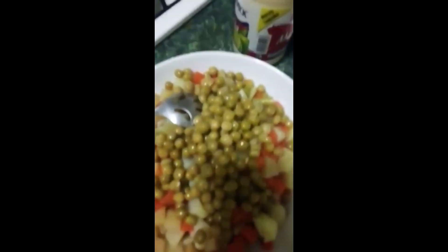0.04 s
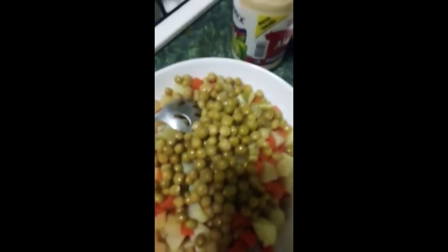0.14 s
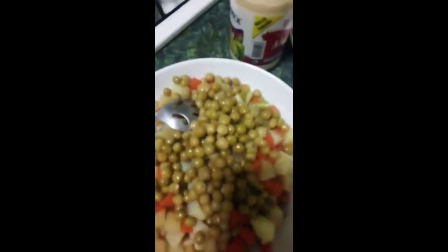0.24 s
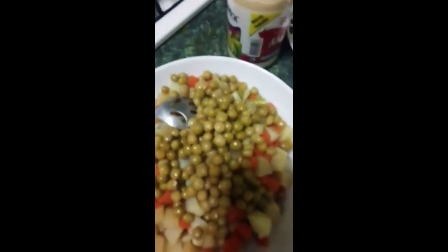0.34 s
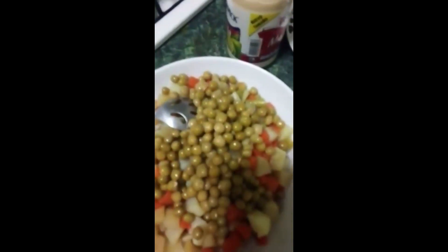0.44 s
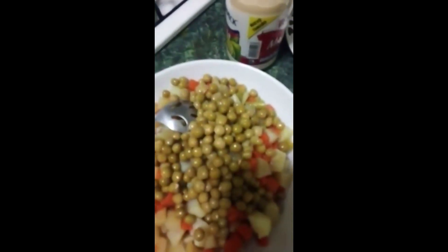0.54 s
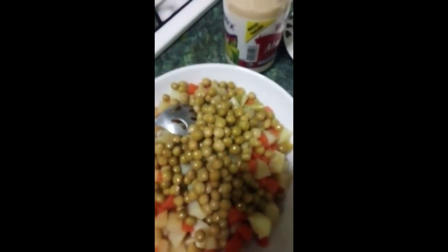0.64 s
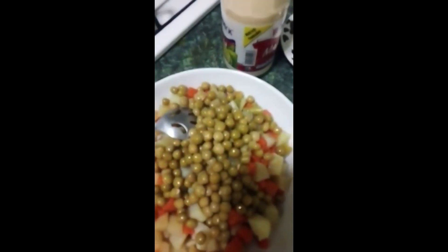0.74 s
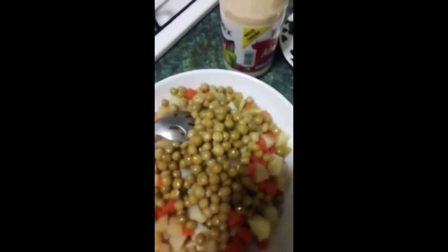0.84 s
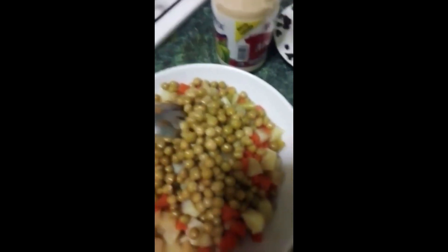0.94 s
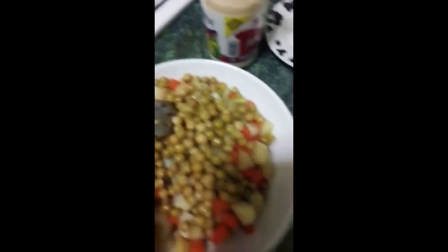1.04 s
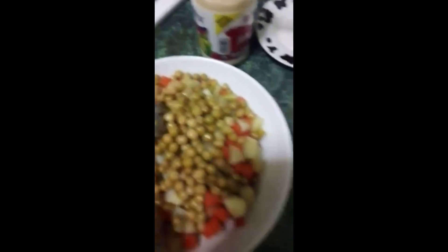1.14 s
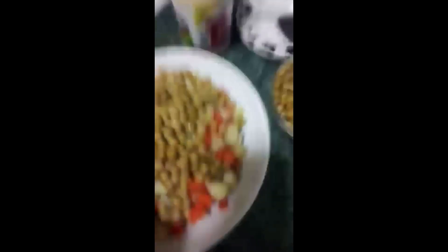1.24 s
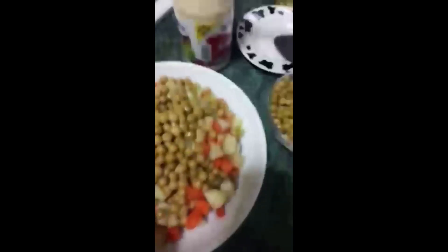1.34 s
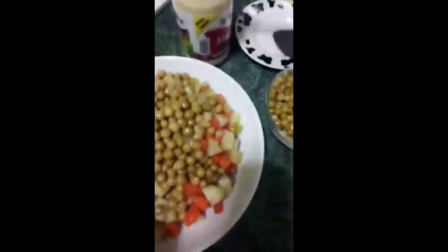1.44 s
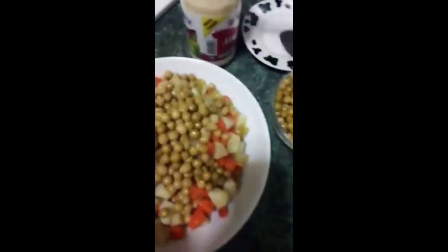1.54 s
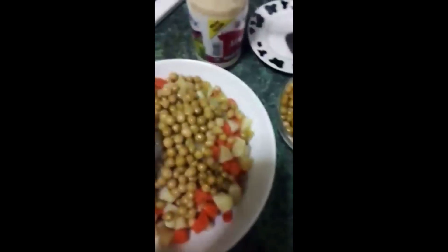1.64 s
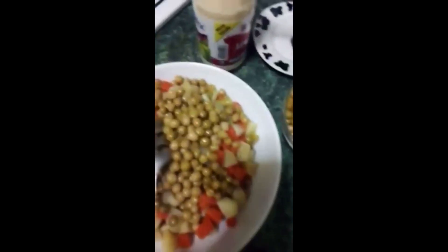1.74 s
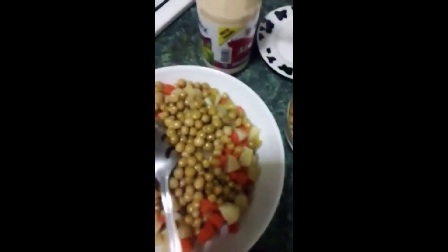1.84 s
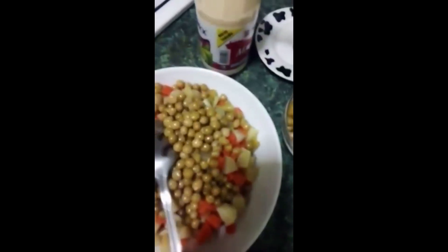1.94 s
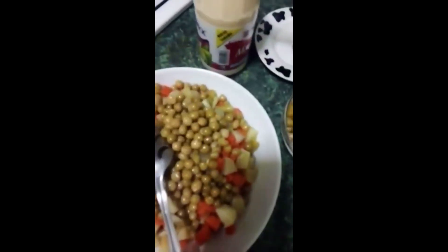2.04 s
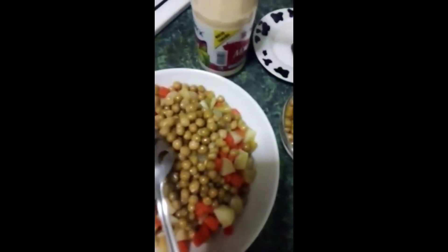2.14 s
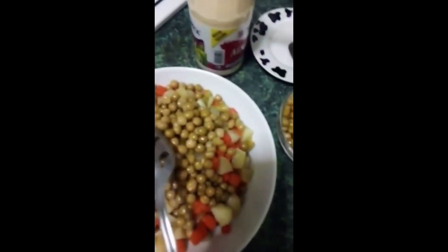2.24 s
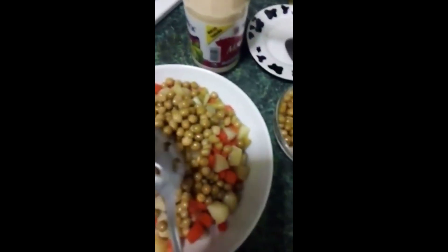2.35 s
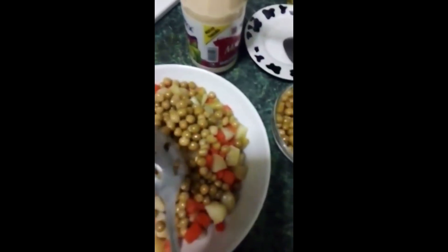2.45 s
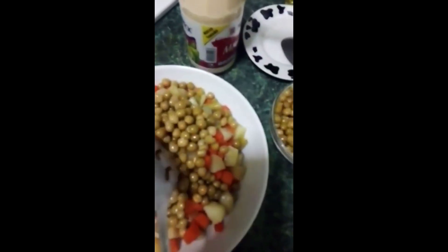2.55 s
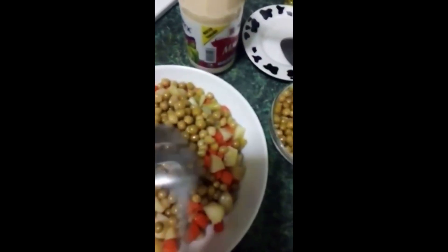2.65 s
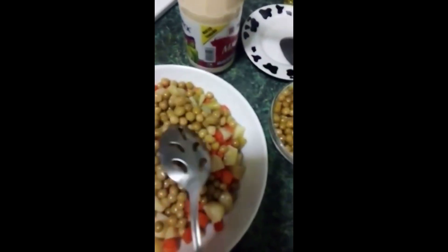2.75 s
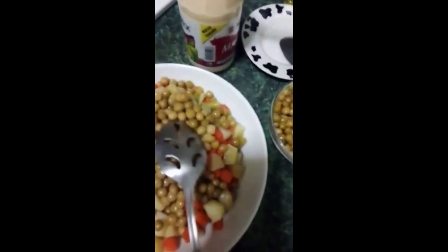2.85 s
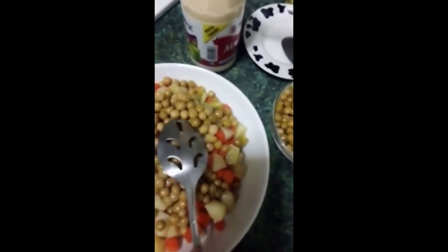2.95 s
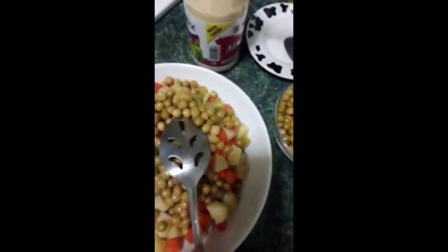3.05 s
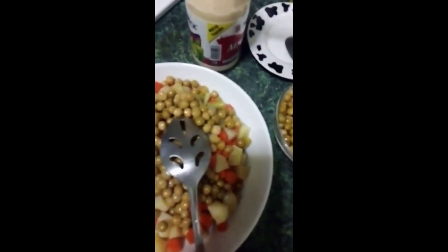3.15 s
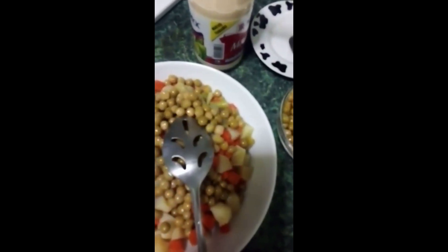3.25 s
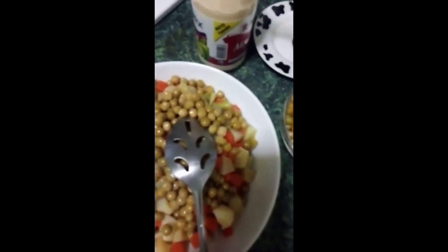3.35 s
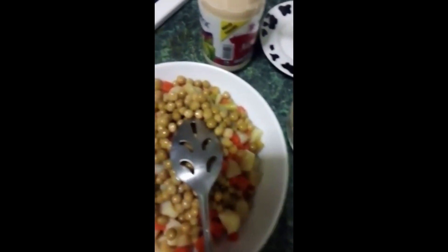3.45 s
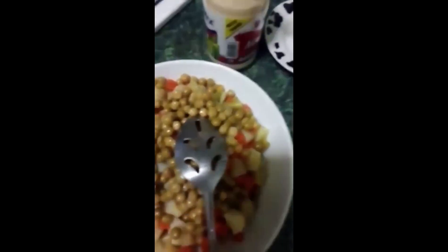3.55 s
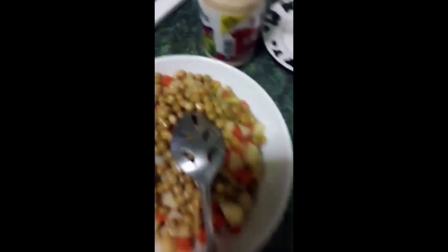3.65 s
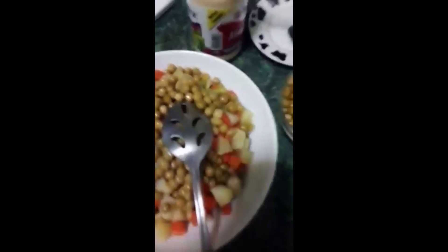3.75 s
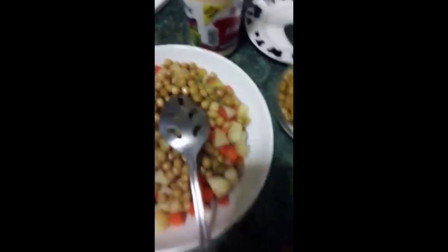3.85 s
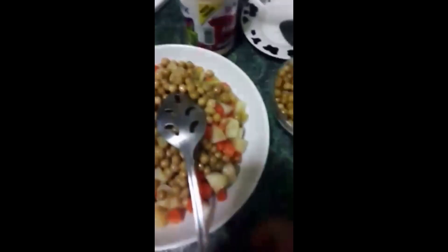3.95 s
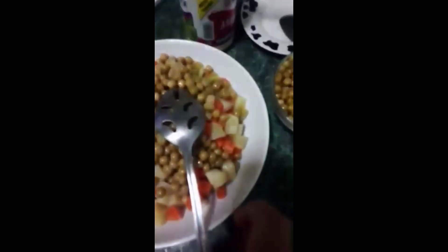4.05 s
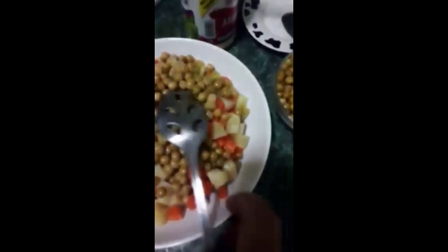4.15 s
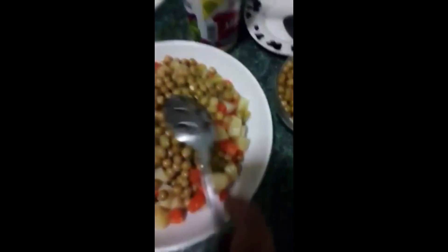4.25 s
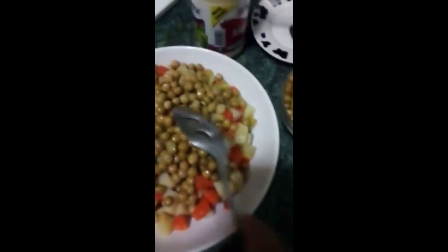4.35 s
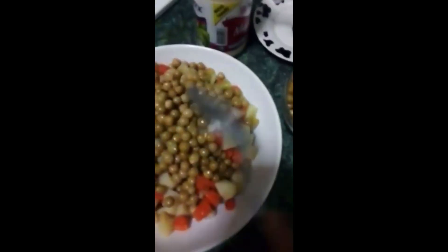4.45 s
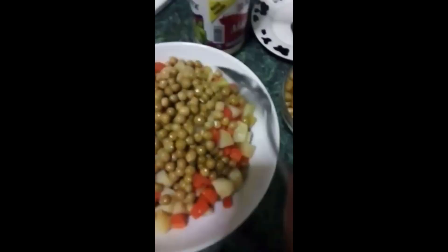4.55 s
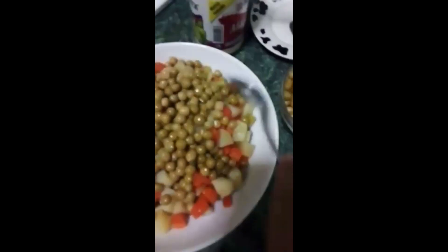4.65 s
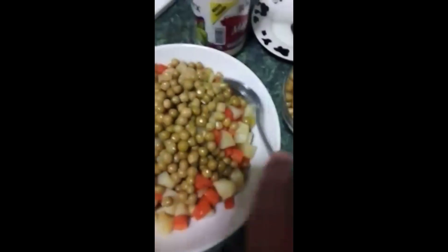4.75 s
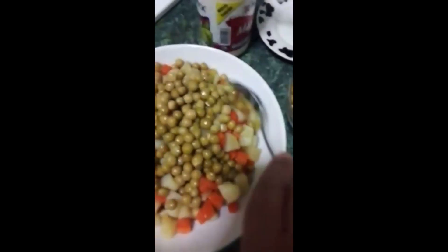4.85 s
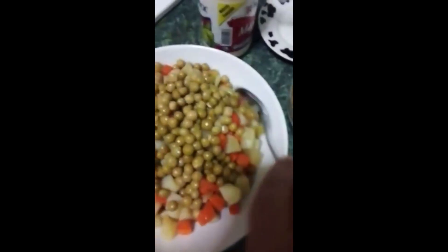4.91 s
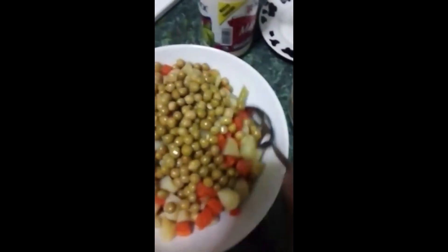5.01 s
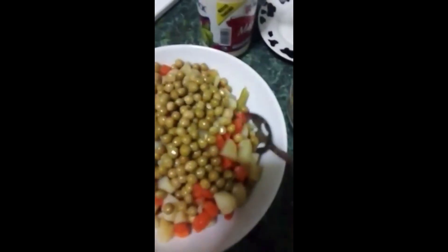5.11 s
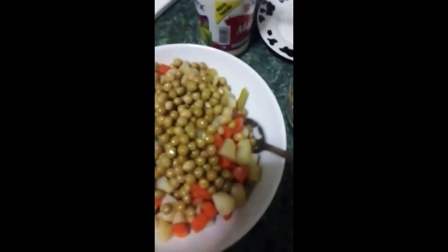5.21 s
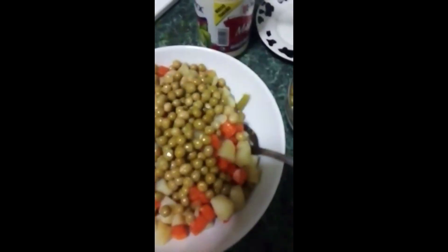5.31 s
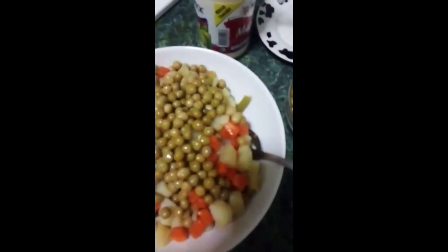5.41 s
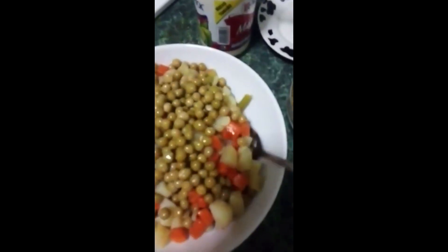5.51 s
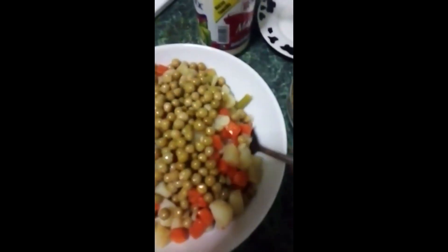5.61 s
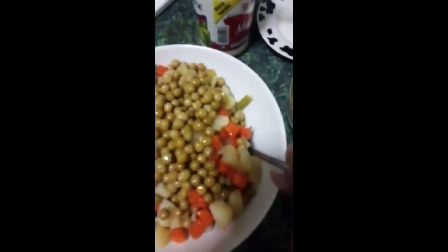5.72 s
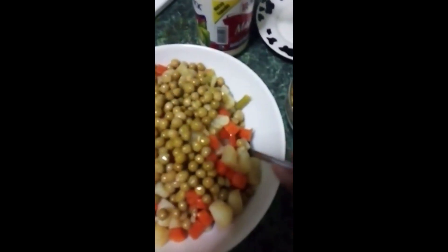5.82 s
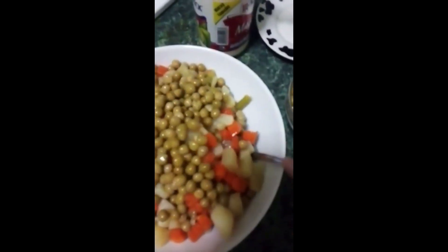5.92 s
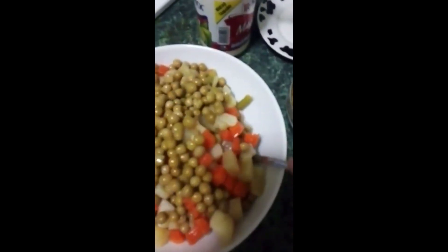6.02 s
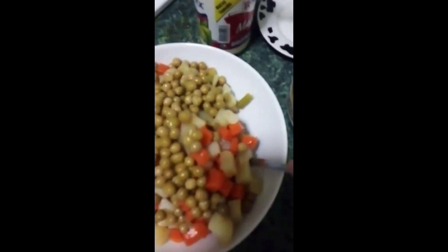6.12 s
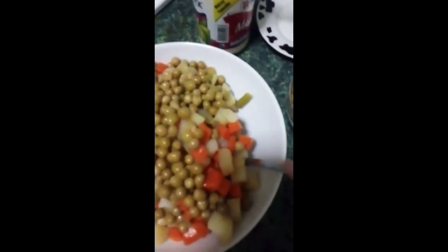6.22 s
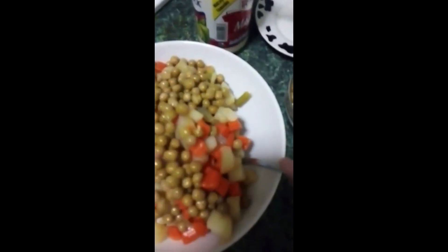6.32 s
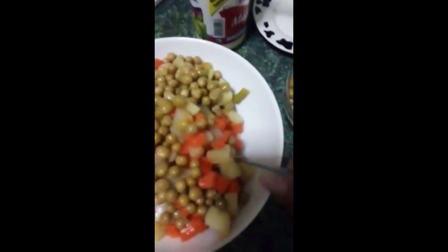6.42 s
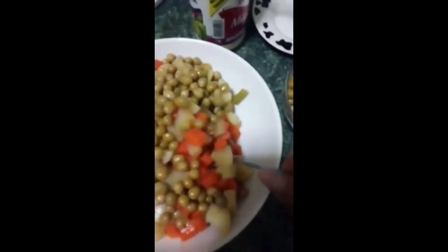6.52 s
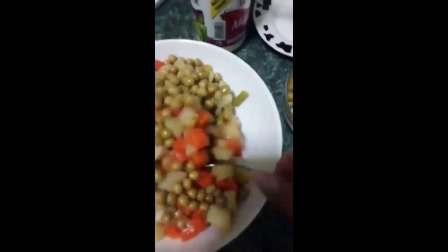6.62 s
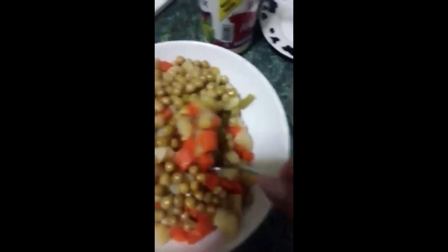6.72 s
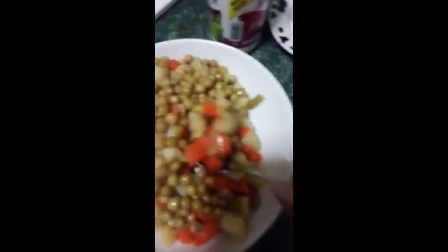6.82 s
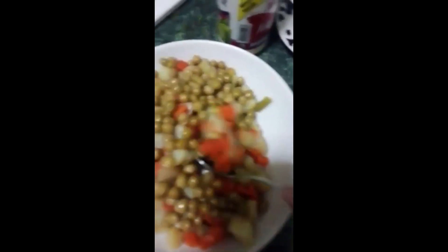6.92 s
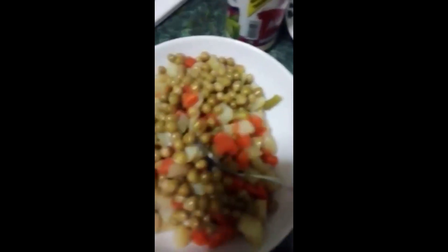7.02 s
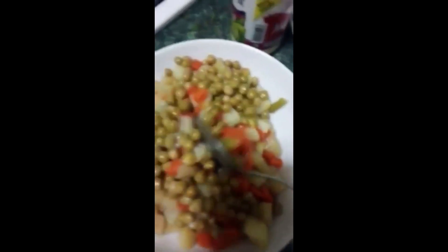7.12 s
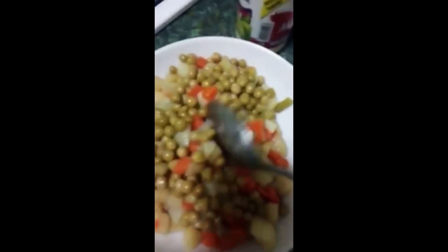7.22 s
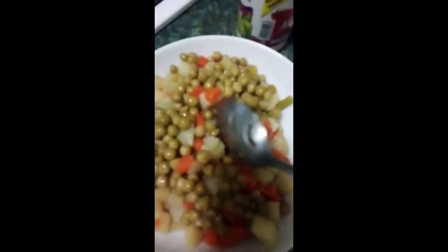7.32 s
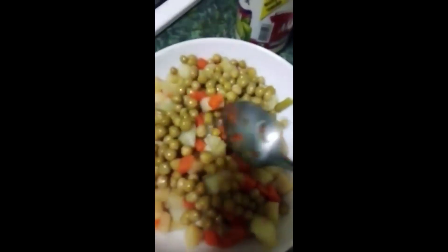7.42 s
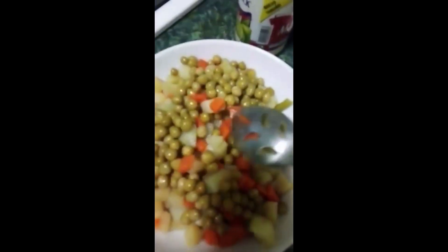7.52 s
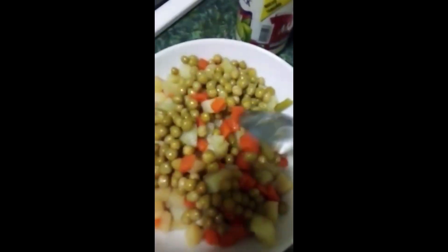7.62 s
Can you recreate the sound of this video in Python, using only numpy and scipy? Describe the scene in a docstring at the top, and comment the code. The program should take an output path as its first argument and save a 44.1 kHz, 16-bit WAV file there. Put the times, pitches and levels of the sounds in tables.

```python
"""Over a low rumble and a faint hush, something soft, slippers or a sleeve, slides nearby: banded hiss.
At 0.8 s a steel spoon judders on a ceramic plate of diced vegetables, then knocks: cracks start ringing modes.
From about 1.8 s a vehicle engine outside gathers speed: three wavering sines at multiples of its firing rate.
From 3.5 s the spoon also scrapes: gritty noise through resonances. Noisy taps and dull bumps come throughout.
A small hard kitchen adds a short noise tail to the sounds close to a hand-held phone."""
import sys
import numpy as np
from scipy import signal
from scipy.fft import rfft, irfft, next_fast_len
from scipy.io import wavfile
from scipy.ndimage import uniform_filter1d

SR = 44100
rng = np.random.default_rng(int(sys.argv[2]) if len(sys.argv) > 2 else 0)


def dump(signal):
    """Clip the signal to [-1, 1] and save it as 16-bit WAV at the path in sys.argv[1]."""
    limited = np.clip(np.atleast_2d(signal).T, -1, 1)
    pcm = np.round(limited * 32767).astype(np.int16)
    wavfile.write(sys.argv[1], SR, pcm)


N = 338231
T = np.arange(N) / SR


def undb(db):
    """Turn decibels into a plain gain."""
    return 10 ** (np.asarray(db) / 20)


def unit(x):
    """Scale x to an rms of 1."""
    return x / np.sqrt(np.mean(x ** 2))


def noise():
    """White noise, a little longer than the scene so that the Fourier transform is fast."""
    return rng.standard_normal(next_fast_len(N))


def walk(rate):
    """Random levels, rate of them per second, smoothed twice into a gentle wander."""
    k = int(SR / rate)
    steps = np.repeat(rng.standard_normal(N // k + 1), k)
    return uniform_filter1d(uniform_filter1d(steps, k), k)[:N]


def grit(spread_db):
    """Dense tiny contacts of uneven size."""
    size = np.minimum(rng.exponential(size=next_fast_len(N)), 4)
    return noise() * undb(spread_db * size)


def colour(x, points, lo_hz=0., hi_hz=SR):
    """Shape x by (pitch_hz, level_db) points, keeping mainly lo_hz to hi_hz; rms 1."""
    f = np.maximum(np.arange(len(x) // 2 + 1) * SR / len(x), 1)
    hz, db = np.transpose(points)
    edges = 1 / np.sqrt((1 + (lo_hz / f) ** 12) * (1 + (f / hi_hz) ** 12))
    shape = undb(np.interp(np.log(f), np.log(hz), db))
    return unit(irfft(rfft(x) * shape * edges, len(x)))


def patchy(x, spread_db):
    """Narrow bands of a hiss flicker on their own."""
    spec = signal.stft(x, nperseg=512)[2]
    field = rng.standard_normal(spec.shape)
    field = uniform_filter1d(uniform_filter1d(field, size=3, axis=0), size=5, axis=1)
    return signal.istft(spec * undb(spread_db * unit(field)), nperseg=512)[1][:N]


def resonance(x, hz, width):
    """One damped mode whose pitch may wander; equal loudness on noise whatever its width."""
    spin = np.exp(2j * np.pi * np.cumsum(hz + 0 * T) / SR)
    fade = np.exp(-np.pi * width / SR)
    # shift the mode down to zero pitch, smooth there, and shift it back
    return np.sqrt(1 - fade) * (signal.lfilter([1], [1, -fade], x / spin) * spin).imag


def stroke(s, rise_s, hold_s, fall_s, edge_db, fade_s):
    """Gain that rises from edge_db, holds and falls back in dB, with a short fade to silence outside."""
    at = s + np.cumsum([0, rise_s, hold_s, fall_s])
    gate = np.interp(T, [at[0] - fade_s, at[0], at[-1], at[-1] + fade_s], [0, 1, 1, 0])
    return gate * undb(np.interp(T, at, [edge_db, 0, 0, edge_db]))


def add(out, s, sound):
    """Mix a sound into out from second s, cut at the end of the scene."""
    start = int(s * SR)
    out[start:start + len(sound)] += sound[:len(out) - start]


def crack(t, db, decay_s):
    """Burst of contact noise, mostly mid-range."""
    burst = undb(db) * rng.standard_normal(len(t)) * np.exp(-t / decay_s)
    return signal.sosfilt(signal.butter(1, [900, 6500], "band", fs=SR, output="sos"), burst)


def bump(t, db, hz):
    """Dull low swing that builds and quickly dies away."""
    swell = t / 0.034 * np.exp(-t / 0.013)
    return undb(db + 6.5) * swell * np.sin(2 * np.pi * hz * t)


# microphone and room hush: pitch_hz, relative level_db per Hz
HUSH_COLOUR = [(180, -23.5), (300, -13), (337, -11.5), (404, -23), (502, -22.5), (942, -23), (1630, -25),
               (4790, -31), (5940, -30), (8550, -40), (15800, -38)]
HUSH_DB = -76.5  # middle of a slow wander


def hush():
    """Faint noise of room and microphone, its level drifting slightly."""
    level = undb(HUSH_DB + 1.1 * walk(4.3))
    return patchy(level * colour(noise(), HUSH_COLOUR)[:N], 0.73)


# loudness of the traffic rumble before it surges: time_s, level_db
RUMBLE_LEVEL = [(0.0, -74.5), (1.45, -78), (3.5, -70.5), (5.17, -71), (5.6, -65), (6.5, -66), (7.67, -69)]
# its tone: pitch_hz, relative level_db per Hz
RUMBLE_COLOUR = [(15, -45), (40, -16), (70, -3.5), (95, 6), (130, 2.5), (200, -5), (320, -10), (500, -14),
                 (800, -44.5)]


def rumble():
    """Traffic as low noise whose level surges at random."""
    s, db = np.transpose(RUMBLE_LEVEL)
    level = undb(np.interp(T, s, db) + 3.5 * walk(11))
    return level * patchy(colour(noise(), RUMBLE_COLOUR)[:N], 2.5)


# engine orders swell and fade on their way in: time_s, order_1_db, order_2_db, order_3_db
ENGINE_LEVEL = [(1.8, -83.5, -97, -86), (2.4, -62.5, -75, -84.5), (2.5, -62.5, -87, -99),
                (2.75, -77, -92, -94), (3.1, -61, -85, -106), (3.5, -72, -87, -67.5),
                (3.9, -73, -89, -87.5), (4.22, -58, -60, -67), (4.4, -76, -74, -82.5),
                (4.9, -72, -67.5, -61), (5.1, -74.5, -64, -84), (5.4, -58, -70, -87.5),
                (5.65, -56.5, -57.5, -76), (6.15, -57, -60.5, -86.5), (6.3, -85.5, -70, -74.5),
                (6.47, -58, -54.5, -69.5), (6.72, -79, -56, -64.5), (6.82, -58, -57.5, -91.5),
                (6.95, -74.5, -70, -73), (7.5, -75.5, -66.5, -87), (7.63, -73, -50, -85)]
# engine gathering speed: time_s, firing_rate_hz
ENGINE_SPEED = [(1.8, 86.6), (4.2, 111), (5.2, 121.9), (6.1, 131.1), (6.6, 136.6), (7.2, 146),
                (7.67, 152.5)]
DROPOUT_DB = 10.5  # how strongly an order drops out now and then


def engine():
    """Only the lowest firing orders pass the walls; each surges and wavers on the way."""
    s, *order_db = np.transpose(ENGINE_LEVEL)
    turns = np.cumsum(np.interp(T, *np.transpose(ENGINE_SPEED))) / SR  # firing cycles so far
    out = np.zeros(N)
    for order, db in enumerate(order_db, start=1):
        surge_db = 2.5 * walk(10) + 3.5 * walk(45)
        dropout_db = DROPOUT_DB * np.maximum(walk(14), 0)
        level = undb(np.interp(T, s, db) + surge_db - dropout_db)
        out += level * np.sin(2 * np.pi * (order * turns + 0.15 * walk(16)))
    fade_in = np.interp(T, [s[0] - .27, s[0]], [0, 1])
    return fade_in * np.sqrt(2) * out


# soft sliding: start_s, rise_s, hold_s, fall_s,
# then below_3750hz_db, near_5000hz_db, near_7000hz_db, treble_db
SLIDES = [(0.01, 0.031, 0.0058, 0.092, -69, -67, -71, -65),
          (0.162, 0.011, 0.098, 0.16, -70, -66.5, -76, -64.5),
          (0.315, 0.16, 0.25, 0.11, -57, -62.5, -66, -59.5),
          (1.039, 0.14, 0.091, 0.074, -60, -67, -70, -64), (1.464, 0.13, .02, 0.18, -67, -84, -72, -76),
          (2.137, 0.018, 0.16, .1, -85, -87, -95, -85),
          (3.22, 0.064, 0.26, 0.0069, -62, -66.5, -66.5, -61.5),
          (3.628, 0.034, 0.2, 0.22, -82, -71.5, -80, -77),
          (4.538, 0.059, 0.1, 0.013, -77, -78.5, -78.5, -80)]
# tone of the sliding, before each band is leveled: pitch_hz, level_db
SLIDE_COLOUR = [(350, -26), (600, -12), (1000, -10.5), (2300, 3.5), (3000, -6), (3800, -15), (4500, -7.5),
                (5200, -5), (5800, -11), (6550, -2), (7400, -10), (10200, -21.5), (12500, -16.5),
                (15600, -11.5)]
SLIDE_EDGE_DB = -12  # level at both ends of a stroke


def slides():
    """Soft friction: near-smooth hiss, each stroke with its own balance of registers."""
    rub = grit(0.92)
    edge_hz = [0., 3750., 5800., 8500., 20000.]
    registers = np.array([colour(rub, SLIDE_COLOUR, lo, hi)[:N] for lo, hi in zip(edge_hz, edge_hz[1:])])
    out = np.zeros(N)
    for s, rise, hold, fall, *register_db in SLIDES:
        hiss = undb(register_db) @ registers
        out += stroke(s, rise, hold, fall, SLIDE_EDGE_DB, 0.018) * hiss
    return patchy(out, 2.6)


# dull bumps through the worktop and the hand: start_s, relative level_db, pitch_hz
BUMPS = [(0.447, -50, 135), (0.708, -49.5, 123), (1.41, -53, 342), (2.103, -51, 79.5), (2.246, -49.5, 82.6),
         (3.274, -36, 106), (5.549, -40, 84), (7.465, -44.5, 300)]


def bumps():
    """Worktop and hand pass on low thumps, each a short swing at one pitch."""
    t = np.arange(int(.2 * SR)) / SR
    out = np.zeros(N)
    for s, db, hz in BUMPS:
        add(out, s, bump(t, db, hz))
    return out


# light taps while the spoon is pressed into the food: start_s, relative tick_db, ring_db,
# strongest_pitch_hz, fall away from that pitch in db_per_octave
TAPS = [(0.158, -60, -52.5, 2390, -9.5), (0.569, -46, -47, 2400, -2.5), (2.735, -60, -67, 1510, -16),
        (4.974, -53.5, -47.5, 10500, -21), (5.563, -47, -46.5, 5600, -6), (5.577, -60, -65, 5960, -13),
        (5.65, -66, -58.5, 1210, -20), (5.657, -44, -54, 10400, -7), (5.709, -59, -68, 10000, -19),
        (5.724, -49, -59, 8240, -11), (5.768, -60, -65, 5640, -20), (6.295, -66, -52, 1090, -22),
        (6.355, -63, -55.5, 1040, -29)]
# spoon and plate damped by contact: pitch_hz, relative width_hz, level_db (used by the taps and the scrapes)
PRESSED = [(1153, 77, -6.5), (2510, 190, -0.5), (4640, 170, -0.5), (5220, 210, -0.5), (7600, 220, -2.5),
           (10370, 380, -5)]
BODY_DB, BODY_S = -8, 0.0092  # dull noisy body of a tap: level against its ring, decay time


def taps():
    """Ticks that barely ring because contact damps them, each with a dull noisy body."""
    t = np.arange(int(.2 * SR)) / SR
    hz, width, _ = np.transpose(PRESSED)[:, :, None]
    build = 1 - np.exp(-t / 0.00073)
    out = np.zeros(N)
    for s, tick_db, ring_db, most_hz, fall in TAPS:
        detune = 1 + 0.029 * rng.standard_normal(hz.shape)
        gain = undb(ring_db + fall * np.abs(np.log2(hz / most_hz)))
        decay = np.exp(-np.pi * .45 * width * t)
        ring = np.sum(gain * decay * np.sin(2 * np.pi * hz * detune * t), axis=0)
        band = signal.butter(2, most_hz * np.array([.8, 1.25]), "band", fs=SR, output="sos")
        body = unit(signal.sosfilt(band, rng.standard_normal(len(t)))) * np.exp(-t / BODY_S)
        tick = crack(t, tick_db - 11, 0.0036)
        add(out, s, build * (ring + undb(ring_db + BODY_DB) * body + tick))
    return out


# middle of each pitch register of plate and spoon: pitch_hz
RING_HZ = [380, 575, 1260, 1650, 2100, 3140, 4360, 5700, 7300, 10600, 14800]
# spoon dragged over the glaze: start_s, rise_s, hold_s, fall_s, ring_db, food pushed aside food_db
SCRAPES = [(3.491, 0.011, 0.012, 0.16, -63, -61), (3.597, 0.11, 0.066, 0.027, -75.5, -72),
           (4.137, 0.03, 0.0044, 0.039, -65.5, -60.5), (4.76, 0.03, 0.14, 0.15, -61, -62),
           (6.8, .15, .5, .25, -84, -82), (4.96, 0.029, .01, 0.48, -62.5, -70.5),
           (5.172, 0.011, 0.053, .12, -73.5, -55.5), (5.528, 0.019, 0.052, 0.24, -71, -72.5),
           (5.642, 0.014, 0.027, 0.052, -77, -70)]
# hollows between spoon, food and plate that a push stirs: pitch_hz, width_hz, relative level_db
HOLLOW = [(400, 160, -4.5), (1150, 67, 3.5), (1388, 100, 0.5), (1914, 90, -0.5), (2260, 150, -6.5)]
RUB_EDGE_DB = -32  # level at both ends of a stroke
FOOD_COLOUR = [(350, 3), (600, 0), (1150, 3.5), (1500, 7.5), (1950, -8.0), (2600, -10.0), (4000, -21)]  # Hz, dB


def scrapes():
    """Grit under the spoon drives wandering pressed resonances and a few free modes; food rustles lower."""
    ring_gain, food_gain = np.zeros(N), np.zeros(N)
    for s, rise, hold, fall, ring_db, food_db in SCRAPES:
        push = stroke(s, rise, hold, fall, RUB_EDGE_DB, 0.01)
        ring_gain += push * undb(ring_db)
        food_gain += push * undb(food_db)
    rub = grit(2.2)[:N]
    pressed, free, hollow = np.zeros(N), np.zeros(N), np.zeros(N)
    for hz, width, db in PRESSED:
        pressed += undb(db + 5.5 * walk(22)) * resonance(rub, hz * (1 + .035 * walk(14)), width)
    for hz in RING_HZ[4:-1]:
        free += undb(5 * walk(16)) * resonance(rub, hz, 60.)
    for hz, width, db in HOLLOW:
        hollow += undb(db + 4.5 * walk(30)) * resonance(rub, hz * (1 + .05 * walk(9)), width)
    ring = unit(pressed) + undb(-16.5) * unit(free)
    rustle = colour(grit(3.2), FOOD_COLOUR)[:N]
    food = undb(-7.0) * rustle + unit(hollow)
    slip = undb(3.5 * walk(90))  # fast uneven grip
    return patchy(slip * (ring_gain * ring + food_gain * food), 1.8)


# held modes the judder stirs: pitch_hz, relative level_db, t60_s
JUDDER_MODE = [(1409, -14, 0.053), (3020, -4.5, .04), (3300, -10.5, .05), (4980, -14.5, 0.057),
               (5760, -17, 0.066), (7150, -3, .03), (7260, 0.5, 0.032)]
JUDDER_S, JUDDER_END_S, JUDDER_PER_S = 0.806, 0.854, 220  # start, end, bounces per second
JUDDER_DB, JUDDER_GROWTH = -45, 60  # mean level at the start, growth in dB per second


def judder():
    """The spoon's edge bounces on the rim before it lands: quick, uneven, growing short rings."""
    hz, db, t60 = np.transpose(JUDDER_MODE)[:, :, None]
    t = np.arange(int(.08 * SR)) / SR
    decay = np.exp(-np.log(1000) * t / t60)
    ring = np.sum(undb(db) * decay * np.sin(2 * np.pi * hz * t), axis=0)
    ring *= 1 - np.exp(-t / 0.00079)
    out = np.zeros(N)
    chance = rng.standard_normal((16, 2))  # timing and size of each bounce
    at = JUDDER_S + (np.arange(len(chance)) + 0.11 * chance[:, 0]) / JUDDER_PER_S
    for s, size in zip(at, chance[:, 1]):
        if s < JUDDER_END_S:
            add(out, s, undb(JUDDER_DB + 2.3 * size + JUDDER_GROWTH * (s - JUDDER_S)) * ring)
    return out


# bending waves round the rim in each register: waves (a count)
RIM_WAVES = [0, 2, 3, 0, 4, 5, 6, 7, 8, 10, 12]
# strength of each register: relative level_db
REGISTER_DB = [0.8, 1, -5, -1, -0.6, -0.6, -6, 6, 5, -2.5, -3.5]
PIVOT_HZ, SPOON_HZ = 3000, 1650  # where the two slopes meet; register of the spoon bowl
NODE_LEAK = 0.013  # gain added everywhere, so a node is not silent


def landing(db, bass, treble, spoon_db, place_deg):
    """Ring dB of each register: two slopes, and weak where the blow falls on a node of the rim."""
    octave = np.log2(np.array(RING_HZ) / PIVOT_HZ)
    slopes = bass * np.minimum(octave, 0) + treble * np.maximum(octave, 0)
    bowl = spoon_db * np.equal(RING_HZ, SPOON_HZ)
    swing = np.abs(np.cos(np.radians(place_deg) * np.array(RIM_WAVES))) + NODE_LEAK
    return db + np.array(REGISTER_DB) + slopes + bowl + 20 * np.log10(swing)


# spoon on plate: start_s, relative crack_db, freedom (multiplies ring time), contact_ms,
# relative ring_db at PIVOT_HZ, bass and treble slopes in db_per_octave, spoon_bowl_db, place_deg on the rim,
# then three modes that sing out, each pitch_hz, lift_db
KNOCKS = [(0.855, -32, 1.2, 3, -46, 5.9, -4, -4, 38.6, 2097, 15.5, 10670, 14.4, 2842, 7.7),
          (1.911, -33, 1.23, 13, -30, 18, -23, -47, 24.7, 4850, -12, 7200, 7.3, 2300, 6.5),
          (1.979, -29.5, 0.78, 20, -43.5, 1.8, -1, -24, 84, 2097, 6, 1292, 8, 312, 7.1),
          (2.955, -18, 0.82, 1.4, -33, 4.7, -4, 2, 62.34, 9604, 26, 4250, 6, 1560, 16),
          (3.029, -30, 0.75, 5, -44.5, 5.6, -11.5, 4, 59.2, 4947, 11, 2202, 15, 1787, 8.8),
          (4.148, -66, 0.99, 22, -63, 2.9, -1.5, 6, 62, 6690, 25, 4312, 3.3, 1787, 2.7),
          (4.173, -61, 0.78, 5.2, -49, 22, -6, -5, 58.7, 8860, 5, 4330, 2.9, 1060, 6),
          (4.708, -1.5, 0.69, 13, -15, 5.9, -4.5, -28, 73.3, 1256, 8, 566, 5, 7850, 3.6),
          (5.164, -40, 0.52, 2.7, -31, 4.9, -15.5, 3, 57.9, 4360, 4.5, 1930, 23, 2842, 13)]
# plate and spoon modes, close pairs beat: pitch_hz, level_db within its register, t60_s at freedom 1
MODE = [(330, -3, 0.1), (403, 1, 0.1), (557, -0.5, 0.12), (590, 2, 0.1), (980, -8, 0.065), (1267, -1, 0.1),
        (1414, -4, 0.076), (1520, 1.5, .05), (1787, -2, 0.12), (1913, -8, 0.035), (2105.5, -4.5, 0.2),
        (2202, -7, 0.091), (2340, -9.5, .08), (2838, -9.5, 0.064), (3140, 2.5, 0.062), (3153, -2, 0.12),
        (3170, -19, .45), (3338, -15, 0.06), (4280, -3.5, 0.23), (4360, 0.5, .2), (4380, -6, .2),
        (4750, -8.5, 0.14), (4920, -8.5, 0.14), (5570, -14, 0.16), (5692, 3.5, 0.15), (5685, -20, .4),
        (5770, -8.5, 0.068), (6120, -14, .13), (6600, -17.5, 0.1), (7000, -11.5, .1), (7200, -0.5, 0.08),
        (7274, -8, 0.17), (7750, -7.5, 0.14), (8300, -11, 0.076), (8860, -13, 0.28), (9615, -5, 0.046),
        (10670, -6.5, 0.09), (11250, -5, 0.13), (14765, 2.5, .1)]
THUD_HZ, THUD_DB = 191, -4.5  # worktop under the plate; relative to the lowest register
BLUR_HZ = 160  # half width of the smear round each mode at the blow


def knocks():
    """Each blow is a short crack and starts every mode, weighted by where the spoon lands."""
    hz, mode_db, t60 = np.transpose(MODE)[:, :, None]
    t = np.arange(int(.36 * SR)) / SR
    f = np.arange(len(t) // 2 + 1) * SR / len(t)
    build = 1 - np.exp(-t / 0.0015)
    out = np.zeros(N)
    for s, crack_db, freedom, contact_ms, *blow in KNOCKS:
        register_db = landing(*blow[:5])
        sing_hz, sing_db = blow[5::2], np.array(blow[6::2])[:, None]
        lift = np.exp(-(np.log(hz / sing_hz) / .018) ** 2) @ sing_db
        ring_db = np.interp(np.log(hz), np.log(RING_HZ), register_db)
        gain = undb(mode_db + lift + ring_db + 2.2 * rng.standard_normal(hz.shape))
        # chatter against the glaze keeps the ring fed; it fades once the contact ends
        contact_s = contact_ms / 1000
        free_s = np.hypot(t, contact_s) - contact_s
        decay = np.exp(-np.log(1000) * free_s / (t60 * freedom))
        # food resting on the plate makes every mode waver as it fades
        waver_hz, phase = 45 * rng.random(hz.shape), rng.random(hz.shape)
        waver = undb(2.1 * np.sin(2 * np.pi * (waver_hz * t + phase)) * t / (t + 0.016))
        ring = np.sum(gain * decay * waver * np.sin(2 * np.pi * hz * t), axis=0) * build
        # at the blow, many short modes crowd round the clear ones and blur into noise
        smear = np.sum(gain ** 0.72 / (1 + ((f - hz) / BLUR_HZ) ** 2) ** 0.7, axis=0)
        blur = unit(irfft(rfft(rng.standard_normal(len(t))) * smear, len(t)))
        clatter = undb(crack_db - 16.5) * blur * np.exp(-t / 0.013) * build
        snap = crack(t, crack_db - 24.0, 0.0015)
        thud = bump(t, register_db[0] + THUD_DB, THUD_HZ)
        add(out, s, undb(-5.5) * ring + clatter + snap + thud)
    return out


ROOM_T60_S, ROOM_DB, ROOM_HZ = 0.29, -15.5, 5000  # tail length, level, treble cut


def kitchen(x):
    """Many mixed echoes form a fading noise tail, duller than the direct sound."""
    t = np.arange(int(.6 * SR)) / SR
    tail = rng.standard_normal(len(t)) * np.exp(-np.log(1000) * t / ROOM_T60_S) * (t > .004)
    tail = signal.sosfilt(signal.butter(1, ROOM_HZ, fs=SR, output="sos"), tail)
    return x + undb(ROOM_DB) * signal.fftconvolve(x, tail / np.sqrt(np.sum(tail ** 2)))[:N]


def scene():
    """Close sounds ring in the kitchen; engine, rumble and hush join without its tail."""
    # the knocks keep little below 90 Hz
    plate = signal.sosfilt(signal.butter(2, 90, "high", fs=SR, output="sos"), knocks())
    close = slides() + bumps() + taps() + scrapes() + judder() + plate
    return (hush() + rumble() + engine() + kitchen(close))[None, :]


# overall treble tone: pitch_hz, level_db
TREBLE_TONE = [(100, 0), (12900, 0), (13200, -8), (14100, -8), (15000, 4)]
TOP_HZ = 15750  # little is left above this


def record(dry):
    """The treble dips between 13 and 14 kHz, then rises; little is left above TOP_HZ."""
    hz, db = np.transpose(TREBLE_TONE)
    tone = signal.firwin2(255, [0, *hz, SR / 2], undb([db[0], *db, db[-1]]), fs=SR)
    toned = signal.fftconvolve(dry, tone[None], "same")
    return signal.sosfilt(signal.ellip(10, .2, 60, TOP_HZ, fs=SR, output="sos"), toned)


dry = scene()
out = record(dry)
dump(out)
```